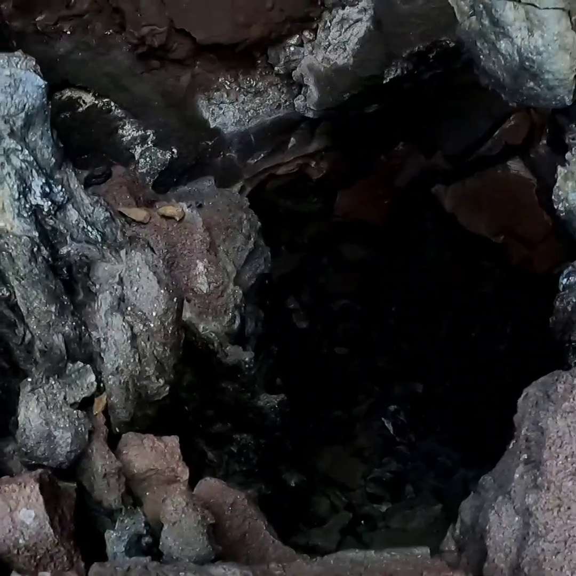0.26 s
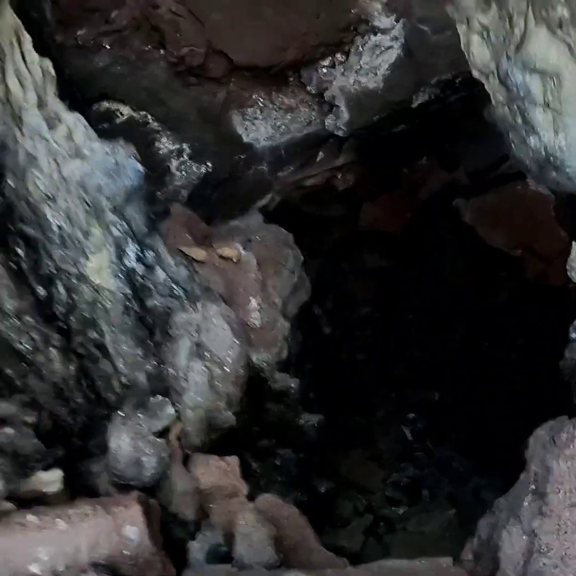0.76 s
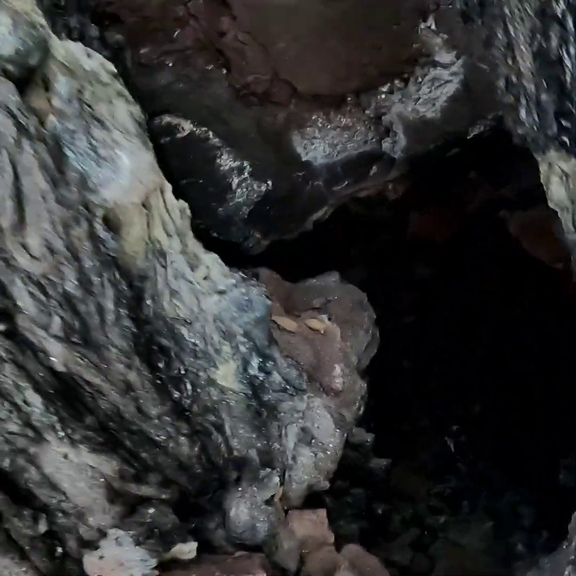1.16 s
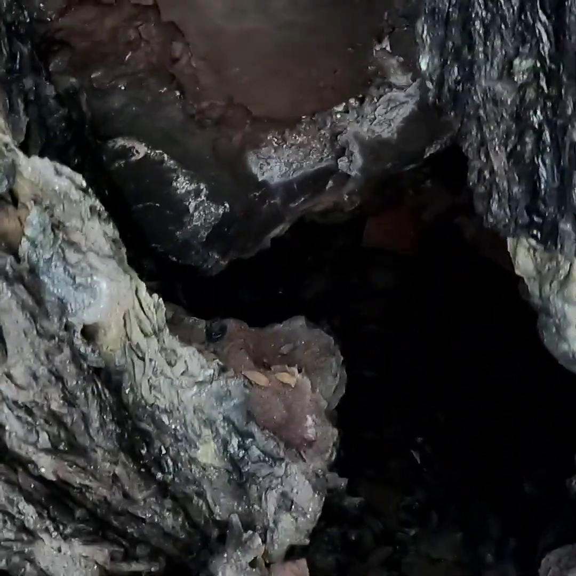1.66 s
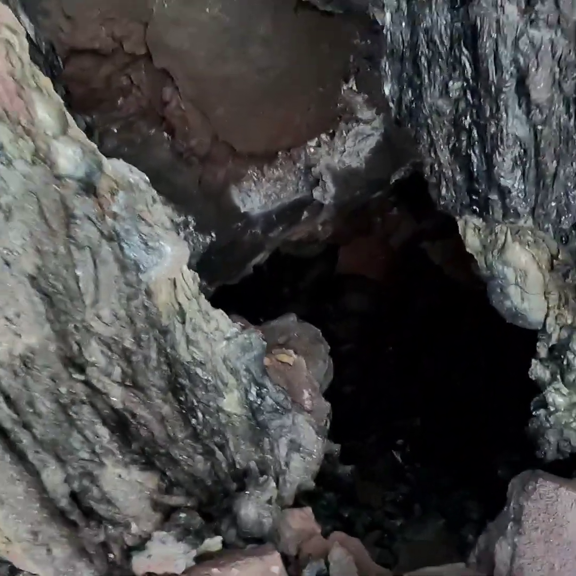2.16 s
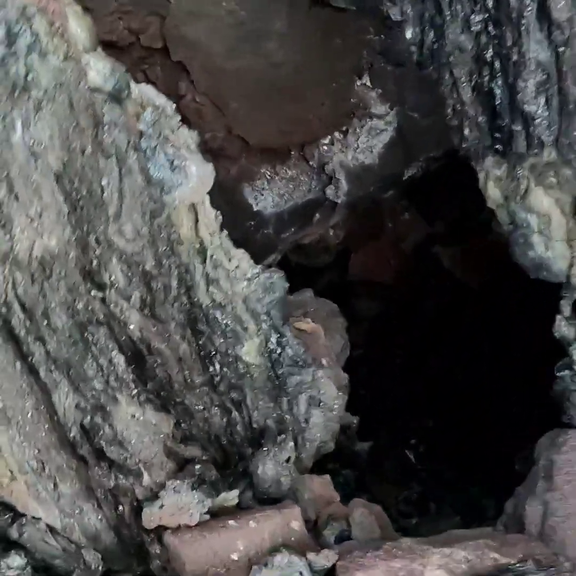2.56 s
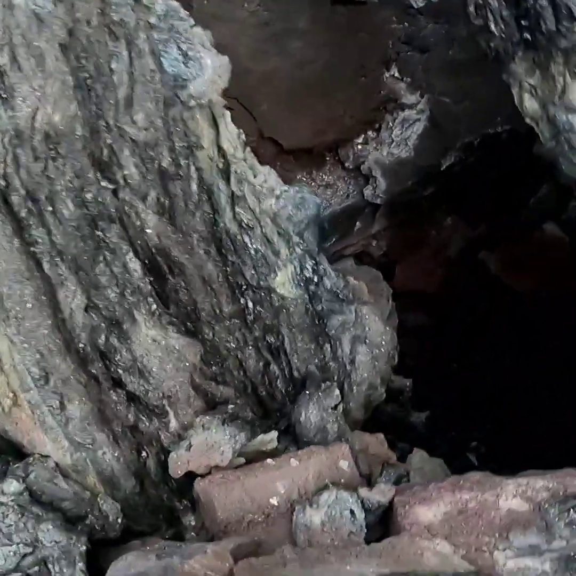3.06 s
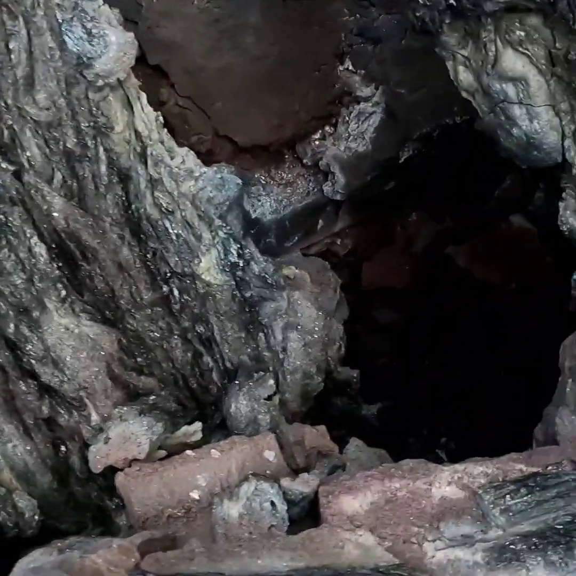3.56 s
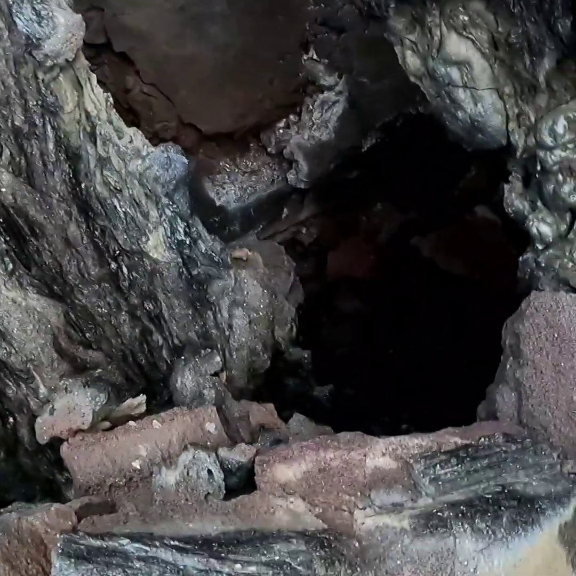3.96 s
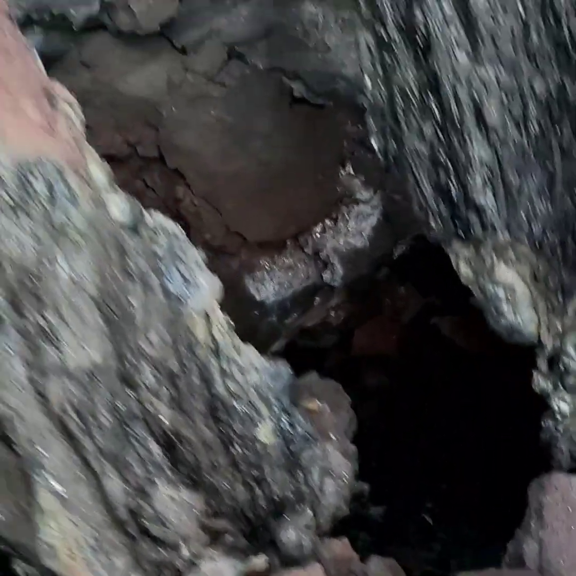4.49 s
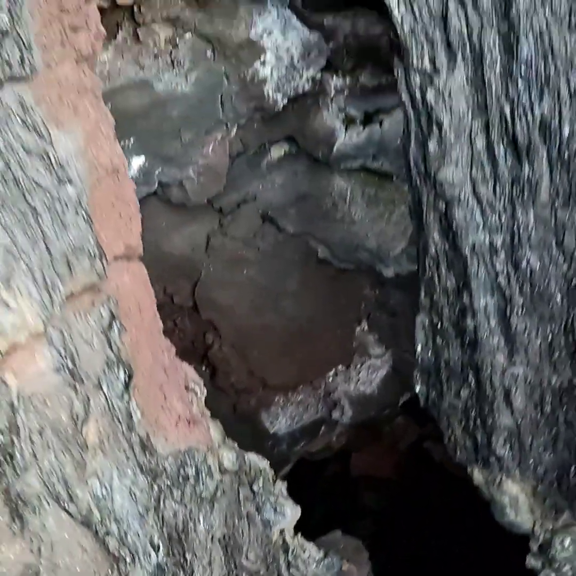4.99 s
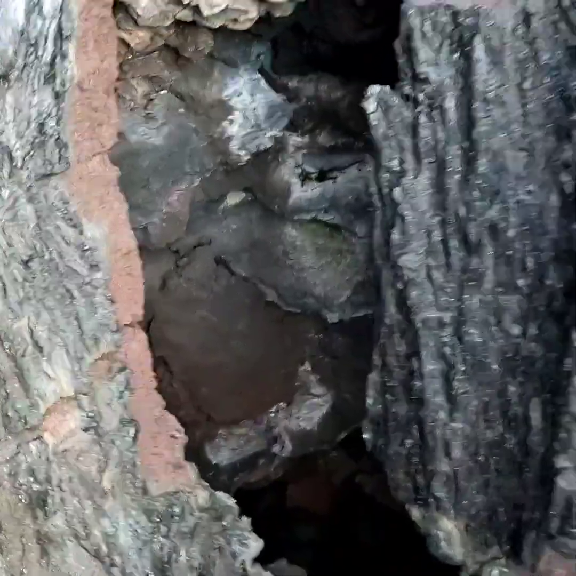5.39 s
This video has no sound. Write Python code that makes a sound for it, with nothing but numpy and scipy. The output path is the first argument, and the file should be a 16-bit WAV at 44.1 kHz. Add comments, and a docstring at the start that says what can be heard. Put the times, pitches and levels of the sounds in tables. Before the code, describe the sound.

Boots shift and crunch on loose, brittle volcanic rock, with sharp pebble clicks, gritty scraping and low wind-like thumps on the microphone.

```python
"""Outdoors on loose, brittle lava clinker, boots shift and step close to a stereo microphone.
Each crunch is a burst of tiny fractures in which one shard rings briefly and the ground thuds.
Single pebbles click, made as shorter bursts; between them shaped noise and ticking chips grind under the sole.
Two slips of trapped grit squeak through gliding resonances. Low noise swells and sags as a light breeze
rumbles and low thumps, from wind or heavy steps, shake the microphone, over a faint wash of still air."""
import sys
import numpy as np
from scipy import signal
from scipy.fft import rfft, irfft, next_fast_len
from scipy.io import wavfile
from scipy.ndimage import uniform_filter1d

SR = 44100
rng = np.random.default_rng(int(sys.argv[2]) if len(sys.argv) > 2 else 0)


def waveform_to_disk(signal):
    """Save audio, clipped to [-1, 1], as 16-bit WAV at the path in sys.argv[1]."""
    frames = np.transpose(np.atleast_2d(signal))
    scaled = np.clip(frames, -1, 1) * 32767
    samples = np.round(scaled).astype(np.int16)
    wavfile.write(sys.argv[1], SR, samples)


N = 248533

# breaking clinker as the microphone hears it: (frequency [Hz], level [dB per Hz])
ROCK = [(290, -16.5), (500, 0.5), (840, -8.5), (1410, -2.5), (2510, -5), (4300, -3), (5300, -3),
        (7000, -10.5), (7800, -12), (8500, -18.5), (10100, -19), (13300, -29), (14500, -46), (15600, -56)]


def gain_of(db):
    """Amplitude factor of a level in dB."""
    return 10 ** (np.asarray(db) / 20)


def evened(x):
    """Scales each row to an RMS of one."""
    return x / np.sqrt(np.mean(x ** 2, -1, keepdims=True) + 1e-20)


def loud(x):
    """Scales to a peak of one."""
    return x / abs(x).max()


def read(points, hz):
    """Reads a curve of (frequency, value) points along a log frequency axis."""
    f, value = np.transpose(points)
    return np.interp(np.log(hz + 1), np.log(f + 1), value)


def per_sample(gains):
    """Spreads gains given every millisecond over the samples."""
    return np.array([np.interp(np.arange(N) / SR, np.arange(len(g)) / 1000, g) for g in gains])


def add(mix, s, sound):
    """Lays a sound into the mix from second s on, cut off at the end of the mix."""
    part = mix[round(s * SR):][:len(sound)]
    part += sound[:len(part)]


def colour(x, db_of):
    """Causal filter with the gain db_of(Hz): its phase follows from the log gain."""
    hz = abs(np.fft.fftfreq(8192, 1 / SR))
    log_gain = np.log(gain_of(np.maximum(db_of(hz), -100)))
    taps = np.fft.ifft(np.exp(np.conj(signal.hilbert(log_gain)))).real[:4096]
    return signal.oaconvolve(x, taps)[:len(x)]


def resonate(x, hz, width):
    """A resonance, width in Hz: shifts the fixed or gliding pitch hz to zero, smooths, shifts back."""
    turn = np.exp(2j * np.pi * np.cumsum(hz * np.ones(len(x))) / SR)
    r = np.exp(-np.pi * width / SR)
    return 2 * (turn * signal.lfilter([1 - r], [1, -r], x / turn)).real


def fractures(shape, per_s, spread_db, hiss):
    """Sparse snaps of random sign, a few of them large, over a fine hiss of dust."""
    size = gain_of(spread_db * np.minimum(rng.exponential(1, shape), 4))
    snaps = size * rng.choice([-1., 1.], shape) * (rng.random(shape) < per_s / SR)
    return evened(snaps) + hiss * rng.standard_normal(shape)


def clumps(spread_db, size):
    """Uneven pressure: a gain that wanders within milliseconds, smoothed over size samples."""
    wander = uniform_filter1d(uniform_filter1d(rng.standard_normal(N), size), size)
    return gain_of(spread_db * evened(wander))


def air():
    """Faint steady wash of still outdoor air, partly alike on both ports."""
    # colour of the wash: (frequency [Hz], level [dB per Hz])
    air_curve = [(65, -34.5), (110, -10.5), (156, -9), (343, -21.5), (381, -20), (405, -18), (653, -36),
                 (1050, -18.5), (3490, -47), (4040, -28), (15500, -41)]
    shared, left, right = (colour(n, lambda f: read(air_curve, f)) for n in rng.standard_normal((3, N)))
    return gain_of(-76.5) * evened(np.array([shared + 1.8 * left, shared + 3.4 * right]))


def rumble_swells():
    """Gains of flutter and thumps: smooth bell-shaped swells of the low rumble over a low floor."""
    # smooth swells of the low rumble, before the port gains:
    # (middle [s], half length [s], flutter [dB], thumps over the flutter [dB])
    swell_rows = [(0.046, 0.041, -62, -45), (0.192, 0.02, -37.5, -23), (0.316, 0.058, -40, -24),
                  (0.49, 0.035, -57, -27), (0.693, 0.021, -56, -40), (0.903, 0.045, -51, -40),
                  (1.19, 0.086, -56.5, -22), (1.492, 0.082, -45.5, -27), (1.72, 0.093, -47.5, -10),
                  (1.845, 0.02, -32, 0.5), (1.929, 0.067, -45.5, 6.5), (2.067, .05, -40.5, -1.5),
                  (2.344, 0.092, -36, -0.5), (2.554, 0.062, -33.5, -4.5), (2.678, 0.012, -29, 4),
                  (2.747, .05, -31, -20), (2.935, 0.098, -28, -3.5), (3.068, 0.047, -29, -3.5),
                  (3.226, 0.14, -42.5, 2.5), (3.66, 0.1, -46, -23), (3.8, 0.039, -35.5, -4),
                  (3.89, 0.027, -44, -8), (4.05, 0.091, -37.5, -14), (4.237, 0.046, -44.5, -32.5),
                  (4.322, 0.026, -52.5, -27), (4.497, 0.036, -50.5, -28), (4.604, 0.072, -46.5, -26.5),
                  (4.75, .035, -52.5, -30), (5.094, 0.14, -67, -30), (5.236, 0.028, -54.5, 12),
                  (5.57, .09, -56, -15)]
    # between swells: flutter [dB], thumps [dB]
    lull_db = [-76.5, -93]
    t = np.arange(0, N / SR, .001)
    out = gain_of(lull_db)[:, None] * np.ones(len(t))
    for s, half, db, thump_db in swell_rows:
        bell = np.exp(-abs((t - s) / half) ** 1.76)
        out = np.hypot(out, gain_of([[db], [db + thump_db]]) * bell)
    return per_sample(out)


def low_rumble():
    """Slow flutter of a breeze, and low thumps and shaking of the microphone, from wind or heavy steps."""
    # slow pressure flutter: (frequency [Hz], level [dB per Hz])
    flutter_curve = [(8, -26), (20, 3), (30, -1), (45, -7), (65, -29.5), (100, -87.5)]
    # low thumps and shaking of the microphone: (frequency [Hz], level [dB per Hz])
    thump_curve = [(30, -41.5), (55, -1.5), (75, -5), (105, -10.5), (150, -38), (250, -67.5)]
    flutter_gain, thump_gain = rumble_swells()
    hz = np.fft.rfftfreq(N, 1 / SR)
    curves_db = [read(flutter_curve, hz), read(thump_curve, hz), read(flutter_curve, hz)]
    spectra = rfft(rng.standard_normal((3, N))) * gain_of(curves_db)
    flutter, thumps, own = evened(irfft(spectra, N))
    # level out the noise, so that the gains set the swells
    flutter, thumps = (x / np.sqrt(uniform_filter1d(x ** 2, 3500) + 0.26) for x in (flutter, thumps))
    # left and right gains, stronger on the right, with a little flutter that opposes between the ports
    flutter_ports = gain_of([[-2.5], [4.0]]) * flutter + .15 * np.array([own, -own])
    thump_ports = gain_of([[-1.6], [1.3]]) * thumps
    return flutter_gain * flutter_ports + thump_gain * thump_ports


def pressure():
    """Gains of grit, stones and ground: each scuff sets in, swells or sags, dies away and settles."""
    # scuffs of the sole: (start [s], length [s], grit at the start [dB], swell to the end [dB],
    # heavier stones over the grit [dB], ground rumble over the grit [dB])
    scuff_rows = [(0, 0.22, -83, -13, -3, 11), (0.481, 0.39, -86, 13, 2, 13),
                  (0.84, 0.16, -70, -6, 5.5, 12), (1.017, 0.32, -75, -5.5, 3.5, -1.5),
                  (1.388, .12, -62, 11, -2, -3.5), (1.538, 0.12, -59.5, -2.5, -2, 2.5),
                  (1.716, 0.054, -56.5, 4.5, -15, -11), (1.833, 0.099, -45.5, 10, 2.5, -1),
                  (1.996, 0.058, -44.5, -2, 2, -2.5), (2.086, .11, -53, -1.5, -5, -4),
                  (2.232, 0.13, -45, -4, -1.5, 2), (2.382, 0.26, -63, -13, -1.5, 1),
                  (2.649, 0.031, -52, 9, 5, -3), (2.746, 0.15, -49, -10, 2, -1),
                  (2.893, 0.072, -38, -3.7, -5, -3.5), (2.992, 0.11, -43.5, -1, -4, -1),
                  (3.142, 0.23, -51, -4.5, -2, 5), (3.406, .26, -64.5, -19, -3, 5),
                  (3.714, 0.15, -71, 14, -1, -5), (3.863, 0.15, -68.5, -6.5, 11.5, 18),
                  (4.057, 0.094, -66.5, -6, 2, 5), (4.184, 0.24, -68.5, -11.5, -2, 1.5),
                  (4.458, 0.2, -72, 7.5, -2, -9), (4.643, 0.35, -68, -2, 0.5, -21),
                  (4.933, 0.11, -62.5, -6.5, -1, -25), (5.09, 0.11, -75.5, 12, 5, -17),
                  (5.241, 0.1, -45.5, -9.5, 2, -9), (5.338, 0.092, -43, 6.5, -3, -19),
                  (5.44, 0.18, -42, -7, 1, -2.5)]
    # while the boots rest: grit [dB], stones [dB], ground [dB]
    rest_db = [-91.5, -89, -81]
    press_db_per_s, lift_db_per_s = 698.5, 444.5
    settle_db, settle_db_per_s = -33.5, 92.5  # crumbs keep settling, far quieter and slower
    t = np.arange(0, N / SR, .001)
    out = gain_of(rest_db)[:, None] * np.ones(len(t))
    for s, length, db, swell_db, stones_db, ground_db in scuff_rows:
        u, after = t - s, np.maximum(t - s - length, 0)
        shape = gain_of(swell_db * np.clip(u / length, 0, 1) + press_db_per_s * np.minimum(u, 0))
        shape *= gain_of(-lift_db_per_s * after) + gain_of(settle_db - settle_db_per_s * after)
        out = np.hypot(out, gain_of([[db], [db + stones_db], [db + ground_db]]) * shape)
    return per_sample(out)


def grind():
    """Grit, stones and ground rub in clumps, partly together; small chips tick at their own pitches."""
    # stones rubbing on the ground: (frequency [Hz], level [dB per Hz])
    rub_curve = [(65, -39), (110, -6.5), (183, 2), (267, -4), (414, -10.5), (497, -15), (800, -22),
                 (1100, -16.5), (1600, -18), (2070, -23.5), (2520, -21), (3200, -30.5), (4160, -71.5),
                 (7040, -120)]
    together = clumps(1.64, 300)
    shard = rng.integers(0, 24, N)  # which of the 24 pitches each tick excites
    ticks = together * fractures(N, 700, 3.5, 0)
    pitches = np.geomspace(1000, 8000, 24)
    chips = evened(sum(resonate(ticks * (shard == k), hz, .03 * hz) for k, hz in enumerate(pitches)))
    rubs = [together * clumps(2.2, 250) * fractures(N, 1000, 3.3, .4) for _ in range(3)]

    grit = evened(colour(rubs[0], lambda f: read(ROCK, f))) + .7 * chips
    grit = signal.sosfilt(signal.butter(3, 2500, "high", fs=SR, output="sos"), grit)
    stones = evened(colour(rubs[1], lambda f: read(rub_curve, f))) + 0.38 * chips
    stones = signal.sosfilt(signal.butter(2, [550, 2800], "band", fs=SR, output="sos"), stones)
    ground = colour(rubs[2], lambda f: read(rub_curve, f))
    ground = signal.sosfilt(signal.butter(2, 550, fs=SR, output="sos"), ground)
    return (pressure() * evened(np.array([grit, stones, ground]))).sum(0)


def breaking(burst, bumps_db, hz, width, thud_db, ring_db, tilt_db):
    """Snaps sound through the rock with their own uneven colour, one ringing piece and the ground."""
    # thud of the ground: (frequency [Hz], level [dB per Hz])
    ground_curve = [(45, -29.5), (80, -18), (130, -4.5), (270, -4.5), (400, -9.5), (560, -5), (850, -20),
                    (1400, -65)]
    uneven = np.transpose([np.geomspace(500, 12000, len(bumps_db)), bumps_db])
    tilt_db = tilt_db - 0.5 * np.log2(hz / 2500)  # dB per octave, less for pieces that ring high

    def rock_db(f):
        return read(ROCK, f) + read(uneven, f) + tilt_db * np.log2(np.clip(f, 600, 8000) / 2500)

    broad = colour(burst, rock_db)
    thud = colour(burst, lambda f: read(ground_curve, f))
    ring = resonate(burst, hz, width)
    crack = loud(loud(broad) + gain_of(ring_db) * loud(ring))
    return crack + gain_of(thud_db) * loud(thud)


def clicks():
    """Single pebbles click: one sharp contact and a few milliseconds of chatter."""
    # (time [s], peak before the thud is added [dB], ringing pebble [Hz], ring over the click [dB])
    click_rows = [(0.018, -42.5, 1700, 0.5), (.083, -63, 4730, 12), (.197, -54.5, 3750, -1),
                  (0.514, -52.5, 1280, 12), (0.603, -62.5, 5600, 9), (.669, -48, 1090, 13),
                  (0.741, -52, 1200, 14), (.778, -49, 1140, 4), (.804, -43.5, 1100, 1),
                  (0.831, -47, 1060, -3), (0.869, -45.5, 6560, 2), (.907, -46, 1560, 2),
                  (0.917, -39.5, 1310, -4), (.969, -58, 1120, 6), (1.038, -54.5, 1380, -1),
                  (1.222, -54.5, 1330, 10), (1.361, -51, 1470, -8), (1.389, -46, 1700, 27),
                  (1.414, -55, 2170, -9), (1.462, -30.5, 3040, -14), (1.487, -38, 1033, 3),
                  (1.521, -32.5, 2580, -2), (1.576, -27.5, 4640, -21), (1.588, -24.5, 1940, -8.5),
                  (1.634, -33, 4440, -8), (1.705, -44.5, 4700, -11), (1.72, -34, 4660, -5),
                  (1.746, -35.5, 3560, -1), (1.786, -33, 7580, -6), (1.815, -34, 3300, -8),
                  (2.059, -32, 3630, 1), (2.087, -27, 3120, -6.5), (2.118, -35, 1510, -4),
                  (2.204, -35.5, 3300, -17), (2.269, -36, 910, 6), (2.289, -28.5, 970, -3),
                  (2.386, -39, 3960, -15), (2.536, -45, 3020, -4), (2.731, -38, 3250, 0),
                  (2.779, -31.5, 3310, 3), (2.792, -34.5, 1830, 10), (2.812, -38, 4900, 6),
                  (2.822, -39, 4900, 2), (2.832, -38, 4900, 2), (2.851, -34, 1900, 2), (3.4, -50, 1210, 0),
                  (3.46, -35, 4030, 5.5), (3.859, -43, 980, 2), (4.104, -37, 5410, -1),
                  (4.123, -34.5, 5500, -3.5), (4.133, -36.5, 5300, -3), (4.148, -41, 3840, -7),
                  (4.171, -48, 7500, -1), (4.184, -37, 5500, 0), (4.191, -28.5, 4510, -13),
                  (4.227, -44.5, 5700, -5), (4.239, -47, 5500, -4), (4.255, -39, 5280, -2),
                  (4.288, -54, 5000, -7), (4.305, -57, 7000, -1), (4.347, -46.5, 6520, 1),
                  (4.467, -55, 1390, 3), (4.557, -46.5, 1750, -9), (4.649, -42.5, 1290, -9),
                  (4.744, -44, 1890, -11), (4.787, -44.5, 5070, -6), (4.905, -45, 1870, 11),
                  (4.925, -44, 5080, 10), (4.94, -42.5, 5100, 8), (4.954, -38.5, 4200, -5),
                  (4.973, -47, 2000, -2), (5.028, -51, 1980, 16), (5.053, -42, 1344, 19),
                  (5.074, -45, 1870, 11), (5.134, -49, 1990, 12), (5.146, -41, 1980, 10),
                  (5.166, -52, 2000, 14), (5.178, -48, 2050, 14), (5.151, -37, 4720, -1.5),
                  (5.368, -20.5, 1440, -14), (5.447, -14.5, 4000, -9), (5.538, -26, 4900, -3)]
    t, out = np.arange(4000) / SR, np.zeros(N)
    snaps = fractures((len(click_rows), len(t)), 6000, 2.8, .4)
    bumps_db = 3.5 * rng.standard_normal((len(click_rows), 24))
    for (s, db, hz, ring_db), snap, bumps in zip(click_rows, snaps, bumps_db):
        fade = np.exp(-t / 0.0034) + 0.1 * np.exp(-t / 0.0081)
        burst = snap * np.minimum(t / 0.00066, 1) * fade
        thud_db = -17 - 3 * np.log2(hz / 2500)  # larger, lower pebbles shake the ground more
        width = 60 + 0.023 * hz
        add(out, s, gain_of(db) * breaking(burst, bumps, hz, width, thud_db, ring_db, tilt_db=1))
    return out


def crunches():
    """A lump gives way: snaps swell, crowd for the burst length and stop short, crumbs trailing."""
    # (time [s], peak before the thud is added [dB], ringing shard [Hz], burst length [s],
    # thud over the peak [dB], ring over the burst [dB])
    crunch_rows = [(1.424, -29.5, 2120, 0.017, -26, -20), (1.438, -29, 6680, 0.02, -23, 0.5),
                   (1.531, -32.5, 5300, 0.016, -12, -2), (1.823, -30.5, 3360, .018, 9, -5),
                   (1.826, -19.5, 4210, 0.02, -12, -9), (1.873, -16.5, 4200, 0.04, -9, -26),
                   (1.896, -17, 4350, 0.024, -5.5, 3), (1.926, -17.5, 4620, 0.017, -1, -4),
                   (2.027, -25.5, 1470, .012, -38, -8), (2.18, -27.5, 2250, 0.013, -42, -17),
                   (2.218, -14.5, 4750, .033, -7.5, -20), (2.333, -22, 910, .012, -10.5, -12.5),
                   (2.639, -31.5, 1980, 0.01, -26, -14), (2.664, -19.5, 1100, 0.011, -8, -7.5),
                   (2.684, -22, 3350, 0.0073, -15.5, -3), (2.746, -29.5, 3180, 0.023, -33.5, -11),
                   (2.86, -26, 1310, 0.034, -7, -13), (3.017, -29.5, 1110, 0.019, -7, -3),
                   (3.117, -20.5, 1700, 0.017, -13, -17), (3.156, -15, 2010, 0.0034, -14, -3.5),
                   (3.163, -36, 1880, 0.019, 12, -10), (3.196, -31, 5660, 0.029, -8.5, -10),
                   (3.218, -17, 3680, 0.028, -6, -25), (3.292, -33, 4570, 0.0098, -4.5, -15),
                   (3.816, -36.5, 6000, .02, -1.5, 0), (5.198, -19, 1280, .017, -10, 2.5),
                   (5.212, -15, 1320, 0.02, -12, -9.5), (5.354, -25.5, 5300, 0.012, -33, -0.5),
                   (5.429, -20.5, 1044, 0.007, -45, -3.5), (5.506, -28, 1600, 0.016, -13, -4),
                   (5.548, -17, 1160, 0.026, -51, -15.5), (5.613, -26, 5300, 0.018, -38, -36)]
    rise_s = 0.0033
    t, out = np.arange(6000) / SR, np.zeros(N)
    snaps = fractures((len(crunch_rows), len(t)), 2400, 1.1, 0.34)
    bumps_db = 2.5 * rng.standard_normal((len(crunch_rows), 24))
    for (s, db, hz, length, thud_db, ring_db), snap, bumps in zip(crunch_rows, snaps, bumps_db):
        hold = np.exp(-(t / length) ** 2.93) + 0.23 * np.exp(-t / 0.008)
        burst = snap * np.minimum(t / rise_s, 1) * hold
        add(out, s, gain_of(db) * breaking(burst, bumps, hz, 0.069 * hz, thud_db, ring_db, tilt_db=-0.08))
    return out


def drags():
    """A sole dragged over rock: slips of trapped grit excite three resonances that follow the drag."""
    # one list per drag: (time [s], level [dB], pitch [Hz])
    drag_paths = [
        [(1.83, -32, 4300), (1.866, -47.5, 4330), (1.88, -24, 4140), (1.91, -44, 4440), (1.96, -42, 4840)],
        [(2.86, -58, 4070), (2.9, -38, 4240), (2.935, -31.5, 5030), (2.97, -36, 5240), (3.01, -46, 5330)],
    ]
    out = np.zeros(N)
    for rows in drag_paths:
        s, db, pitch = np.transpose(rows)
        t = np.arange(s[0], s[-1], 1 / SR)
        slips = clumps(3.0, 200)[:len(t)] * fractures(len(t), 1500, 2.5, .4)
        hz = np.interp(t, s, pitch)
        squeak = np.zeros(len(t))
        for ratio, share in [(1, 1), (.76, .5), (1.16, .6)]:
            squeak += share * resonate(resonate(slips, ratio * hz, 900), ratio * hz, 220)
        level = gain_of(np.interp(t, s, db))
        add(out, s[0], level * evened(squeak) * signal.windows.tukey(len(t), .2))
    return out


def ports(x):
    """The two microphone ports differ in level and phase with frequency."""
    # left port over right: (frequency [Hz], level [dB])
    level_curve = [(60, -3.5), (150, -3), (380, -3.5), (950, 0.5), (2380, 3.5), (5980, -1.5), (15000, 5)]
    # left port ahead of right: (frequency [Hz], phase [radians])
    lead_curve = [(60, 0), (300, .3), (780, .9), (2150, -.1), (3200, .2)]
    size = next_fast_len(N + 4096)
    hz = np.fft.rfftfreq(size, 1 / SR)
    half = gain_of(read(level_curve, hz) / 2) * np.exp(.5j * read(lead_curve, hz))
    return irfft(rfft(x, size) * np.array([half, 1 / half]), size)[:, :N]


def echoes(x):
    """The grains lie in several places, each with its own short reflections to either port."""
    # echoes off nearby rock: (frequency [Hz], level [dB])
    scatter_curve = [(60, -21.5), (600, -5), (2000, -3), (5000, -8), (8000, -4), (13000, 3.5)]
    t, places = np.arange(3000) / SR, 4
    # the share of each place wanders within milliseconds
    share = uniform_filter1d(uniform_filter1d(rng.standard_normal((places, N)), 120), 120)
    share /= np.linalg.norm(share, axis=0)
    shape = (places, 2, len(t))
    taps = rng.choice([-1., 1.], shape) * (rng.random(shape) < .08)
    taps *= gain_of(-60 * t / 0.047) * (t > .0003)  # 60 dB down after 47 ms
    taps /= np.linalg.norm(taps, axis=2, keepdims=True)
    sent = share * colour(x, lambda f: read(scatter_curve, f))
    return signal.oaconvolve(sent[:, None], taps, axes=2).sum(0)[:, :N]


def scene():
    """Steps heard directly and off nearby rock, with low rumble and still air."""
    steps = crunches() + clicks() + grind() + drags()
    return ports(steps) + echoes(steps) + low_rumble() + air()


def record(dry):
    """The microphone loses the highest treble; then the band limit of the recorder."""
    dull = signal.sosfilt(signal.butter(4, 13000, fs=SR, output="sos"), dry)
    edge = signal.firwin(2047, 15735, window=("kaiser", 9), fs=SR)
    return signal.oaconvolve(dull, edge[None], "same")


dry = scene()
out = record(dry)
waveform_to_disk(out)
```